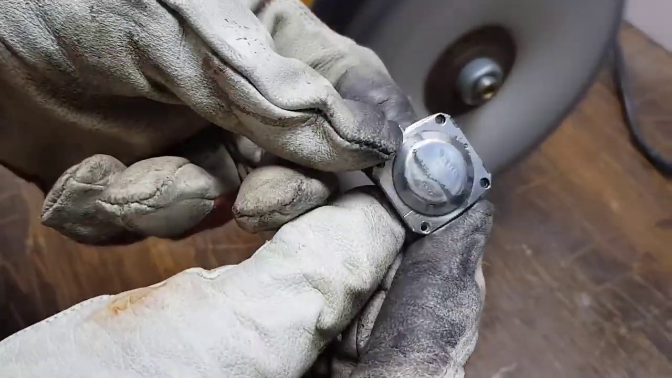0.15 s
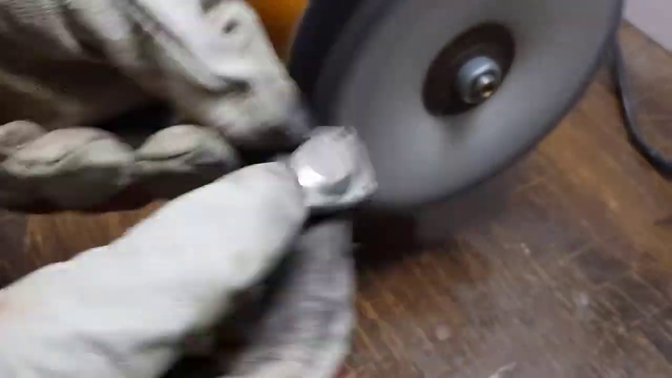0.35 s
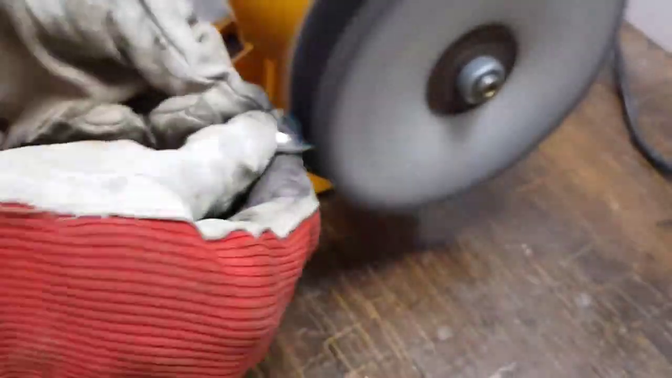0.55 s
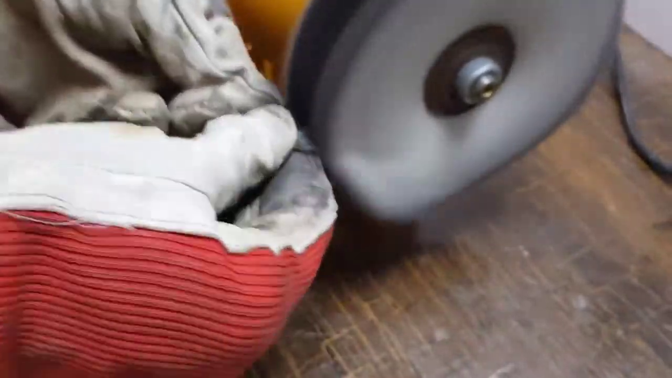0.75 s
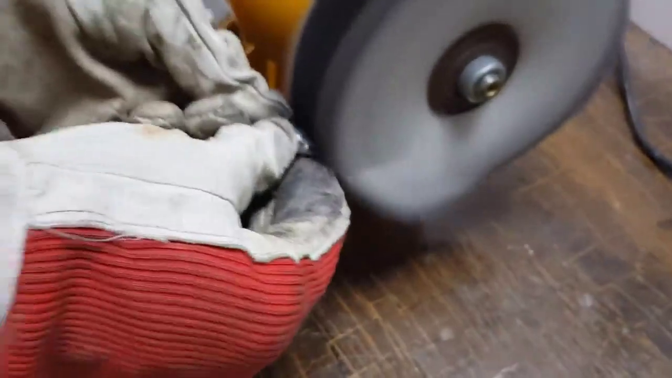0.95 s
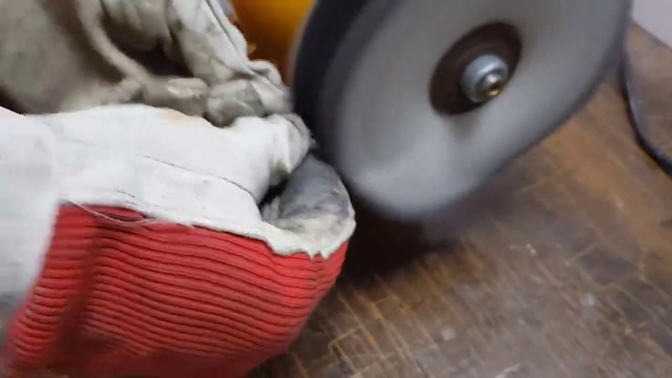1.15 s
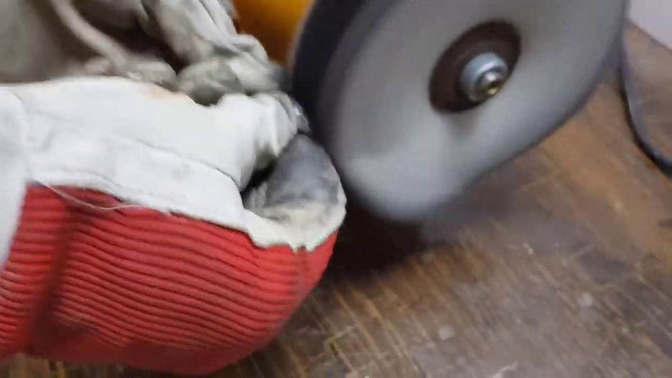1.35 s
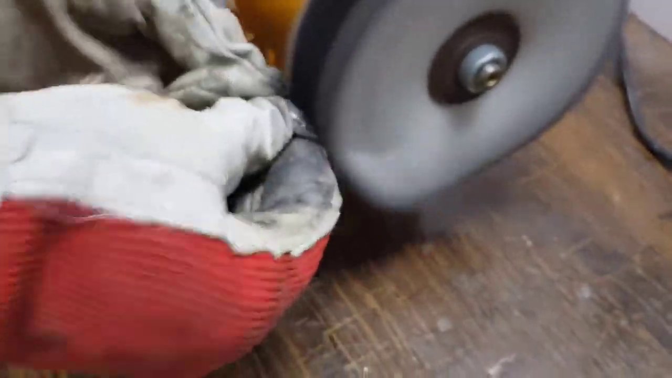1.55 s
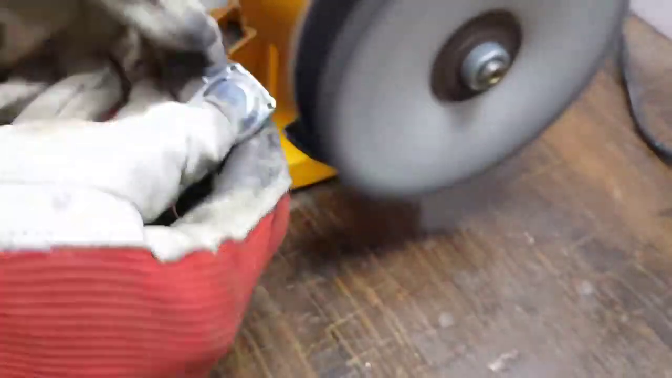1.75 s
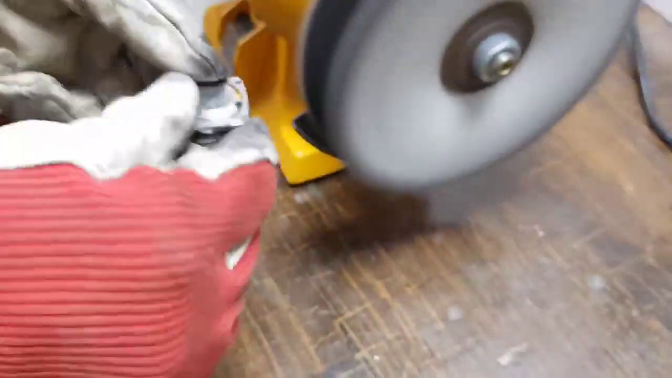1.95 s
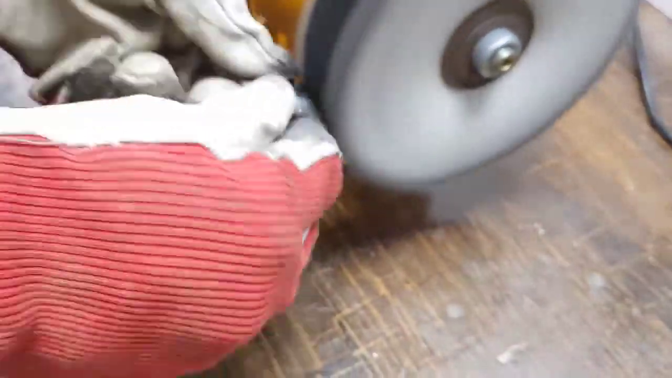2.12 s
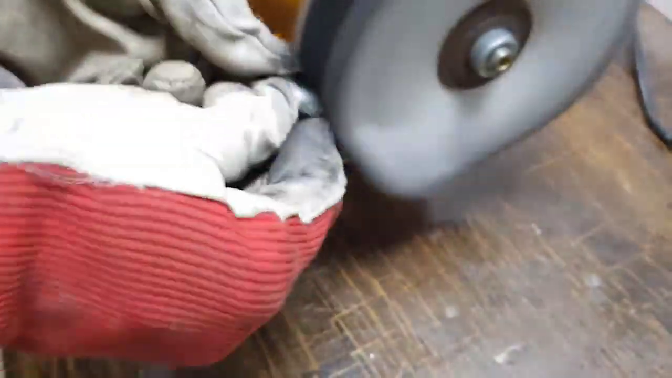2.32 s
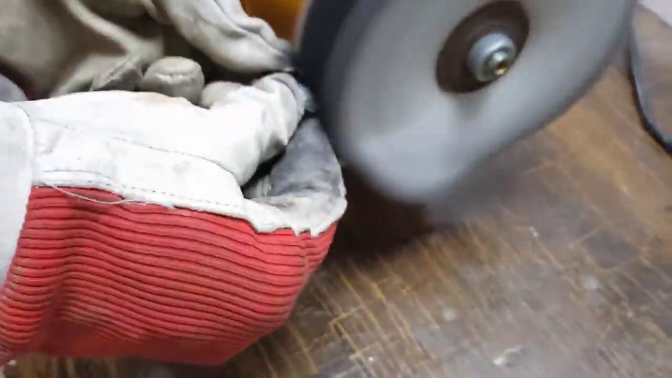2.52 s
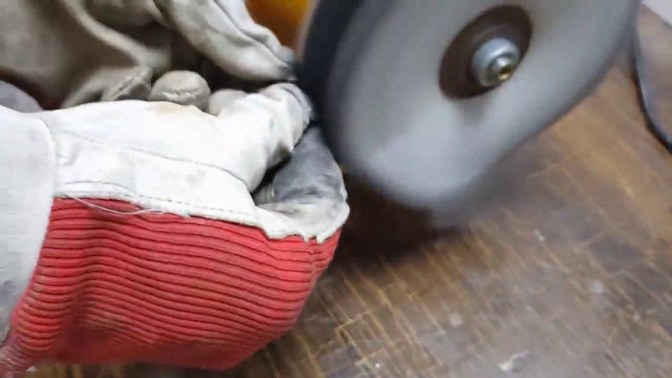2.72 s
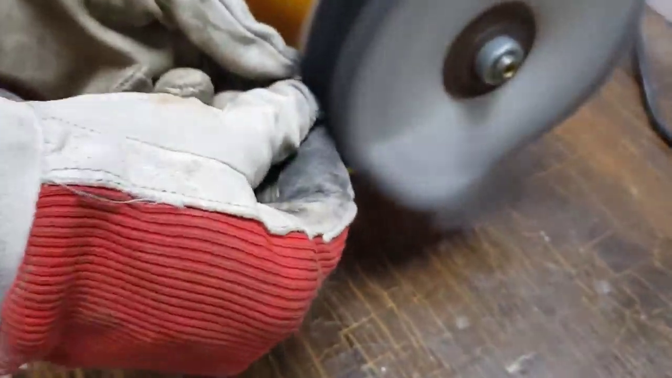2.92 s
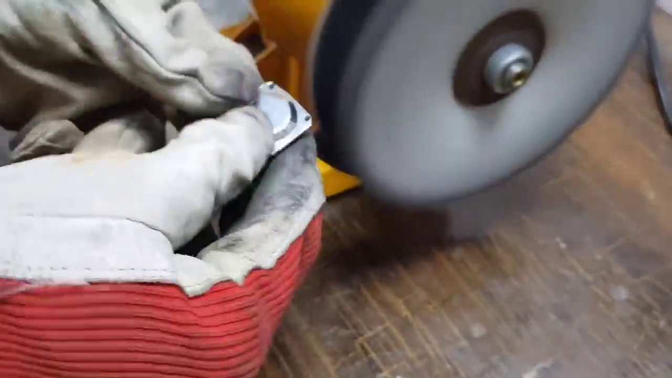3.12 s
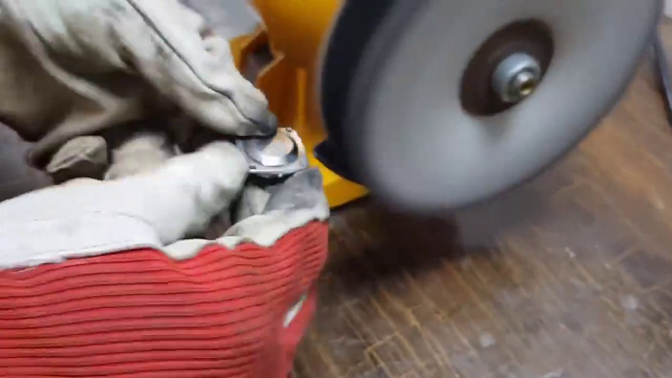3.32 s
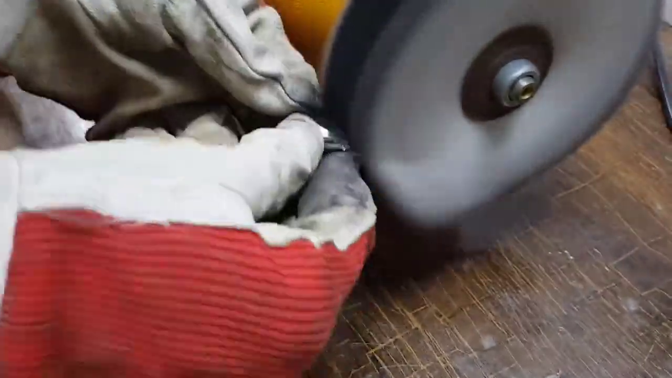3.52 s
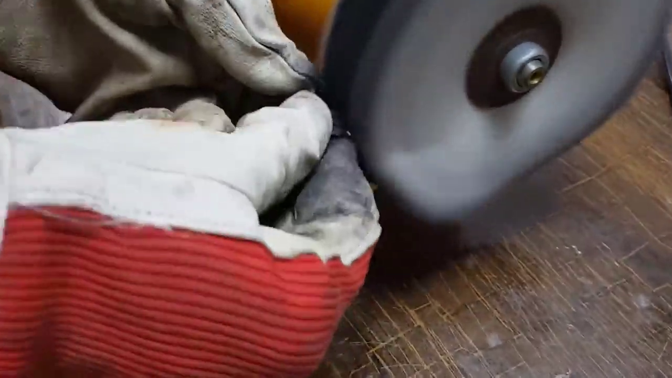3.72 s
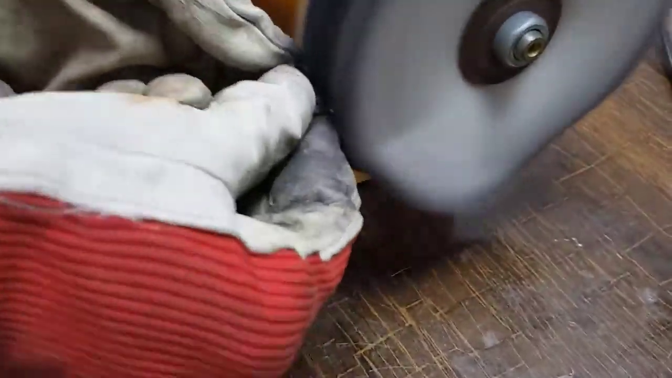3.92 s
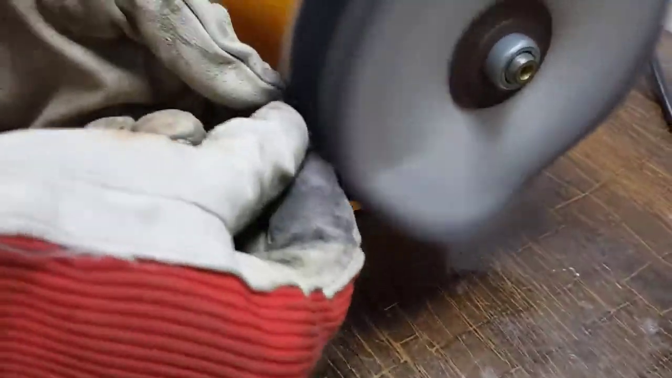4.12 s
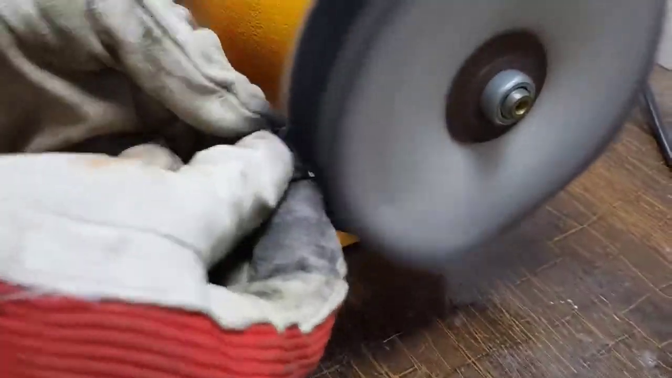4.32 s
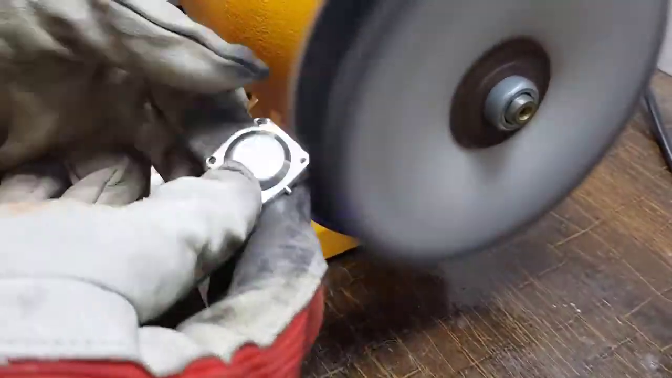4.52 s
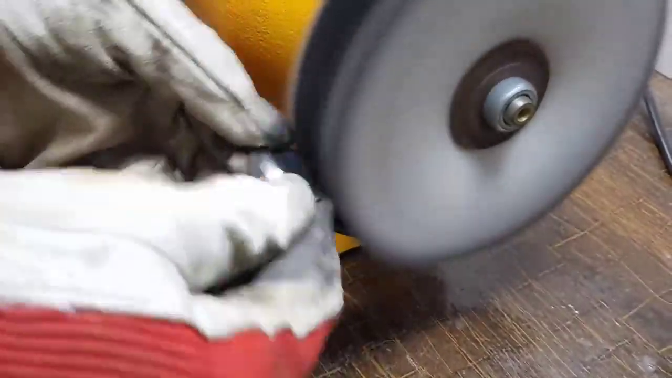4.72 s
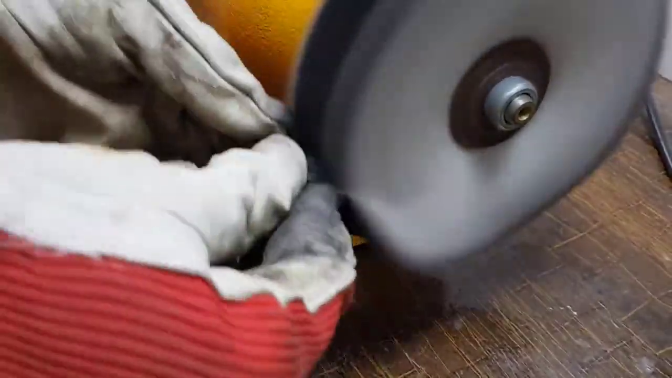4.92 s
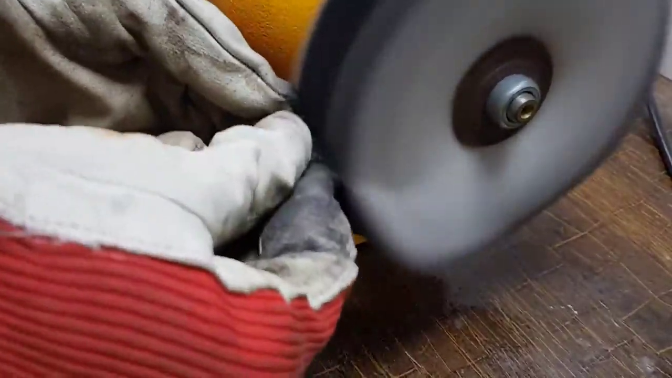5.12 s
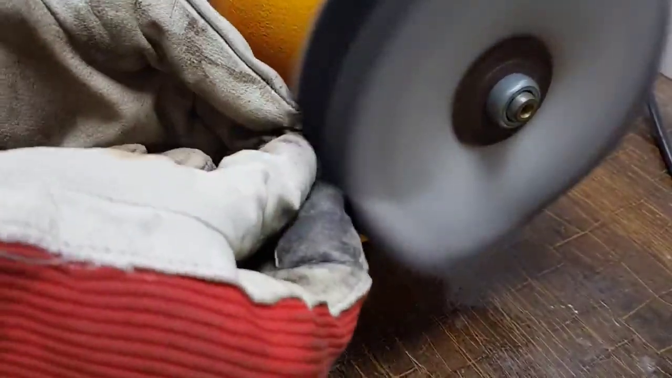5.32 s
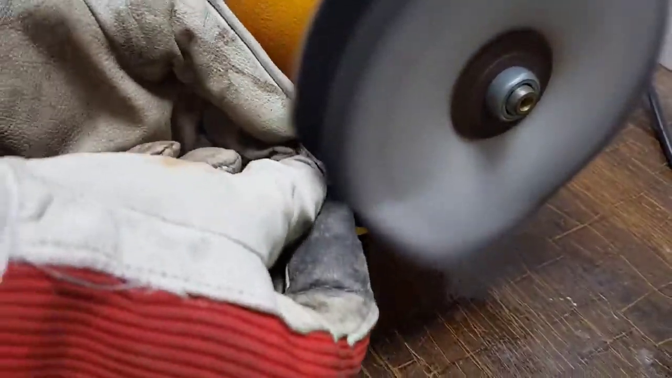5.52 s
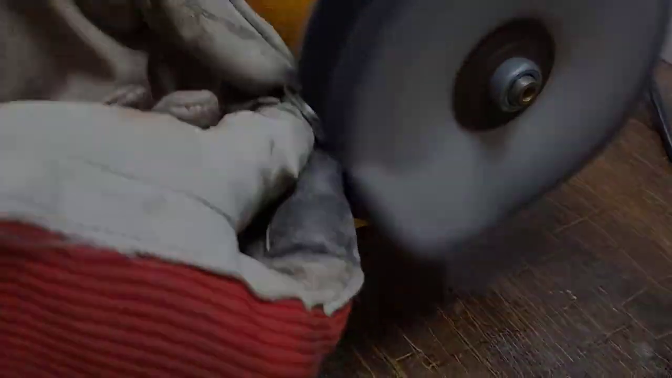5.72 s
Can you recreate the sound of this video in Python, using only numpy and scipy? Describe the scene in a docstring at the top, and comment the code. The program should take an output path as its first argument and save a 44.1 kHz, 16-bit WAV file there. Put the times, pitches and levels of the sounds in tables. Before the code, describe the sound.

A small bench grinder spins freely from 0 to 0.64 seconds, a low hum near 150 hertz with thin whine and fan rush. A steel cap then touches the wheel and grinds until 1.65: dense gritty rasp, broad metallic ringing around 5 to 8 kilohertz and airy hiss, fluttering rapidly with each wheel turn. Pitch sags a few percent as housing tones buzz underneath. The contact stops sharply and the quieter idle whirr returns. A second press lasts from 2.18 to 3.06, sagging deepest. The third, 3.47 to 4.43, is brighter and much hissier, with a soft low air puff on the left near 4.13. After another short idle, the fourth starts at 4.81, fierce and sizzling, continuing to about 5.9, virtually the end. Pressure wavers throughout. The close, dry stereo is louder and brighter on the right, facing the wheel; the left is shaded and weaker.

```python
"""A small fast bench grinder whirrs at idle; four times a gloved hand presses a steel cap on its wheel.
The press rasps, rings and hisses: random grit is read off the rim at the contact, partly kept from turn
to turn, so the sound repeats at the shaft speed, which sags under load. Shaft-order tones join it.
The motor is sine orders over the fan's shaped noise, the draught low noise with puffs.
The near (right) microphone port faces the wheel, the far (left) one is shaded."""
import sys
import numpy as np
from scipy import signal
from scipy.fft import rfft, irfft, next_fast_len
from scipy.io import wavfile
from scipy.ndimage import uniform_filter1d, map_coordinates

SR = 44100
rng = np.random.default_rng(int(sys.argv[2]) if len(sys.argv) > 2 else 0)


def log_audio(samples):
    """Write samples as a 16-bit WAV file to the path given in sys.argv[1]."""
    # one column per channel
    frames = np.atleast_2d(samples).T
    # limit to full scale, then quantise
    limited = np.clip(frames, -1, 1)
    pcm = np.round(limited * 32767).astype(np.int16)
    wavfile.write(sys.argv[1], SR, pcm)


N = 258426
TIME_S = np.arange(N) / SR
IDLE_HZ = 153.6  # shaft turns per s

# shaft under load, one list per press, levels before trim:
# time_s, shaft_hz, fourth_order_db, eighth_order_db
SHAFT_LOAD = [
    [(.69, 151, -72, -55), (.87, 148.5, -70, -51), (1.03, 147.4, -64, -49), (1.2, 146.5, -60, -52),
     (1.28, 147.1, -67, -52), (1.4, 147.8, -62, -51), (1.63, 147, -65, -49)],
    [(2.25, 150.9, -72, -53), (2.34, 148, -62, -47), (2.5, 145.7, -57, -48), (2.68, 146.1, -69, -49),
     (2.87, 145.2, -69, -49), (2.98, 143.5, -70, -52), (3.04, 143, -74, -57)],
    [(3.53, 148.5, -64, -48), (3.71, 145.4, -58, -53), (3.82, 146.5, -61, -54), (4.04, 144.5, -67, -55),
     (4.14, 145.5, -57, -54), (4.3, 145.9, -64, -57), (4.41, 145.8, -61, -59)],
    [(4.88, 150.9, -72, -66), (4.96, 149.2, -62, -56), (5.22, 146, -57, -58), (5.39, 147.4, -60, -53),
     (5.48, 147.6, -67, -57), (5.65, 146.5, -58, -63), (5.78, 146.5, -58, -53), (5.86, 146.6, -62, -58)],
]
# presses: touch_s, lift_s, lift_fade_db_per_s, base grit share kept per turn at touch (0-1), at lift (0-1),
# high_spot_bite_db before scaling per layer, seventh_order_top_db before trim, draught_db
PRESS_ROWS = [(0.637, 1.647, 516, 0.4, 0.45, 1.5, -58.5, -80),
              (2.183, 3.061, 995, 0.47, 0.53, 1.5, -53, -77),
              (3.469, 4.43, 995, 0.46, 0.32, 0.5, -61, -71.5), (4.808, 5.896, 991, 0.46, 0.85, 3, -81, -78)]
(TOUCH_S, LIFT_S, FADE_DB_PER_S, KEPT_AT_TOUCH, KEPT_AT_LIFT,
 BITE_DB, SEVENTH_TOP_DB, DRAUGHT_DB) = np.transpose(PRESS_ROWS)
TOUCH_DB_PER_S = 1202  # rise into the touch

PRESS = np.searchsorted((LIFT_S[:-1] + TOUCH_S[1:]) / 2, TIME_S)  # index of the nearest press
SINCE_TOUCH_S = TIME_S - TOUCH_S[PRESS]
PAST_LIFT_S = np.maximum(TIME_S - LIFT_S[PRESS], 0)
ALONG = np.clip(SINCE_TOUCH_S / (LIFT_S - TOUCH_S)[PRESS], 0, 1)  # 0 at touch, 1 at lift


def amp(db):
    """Amplitude ratio of a level in dB."""
    return 10 ** (np.asarray(db) / 20)


def unit(x):
    """x scaled to an RMS of 1 per channel."""
    return x / np.sqrt(np.mean(x ** 2, axis=-1, keepdims=True) + 1e-20)


def along(points, hz):
    """Interpolates (Hz, value) points on a log frequency axis."""
    f, v = np.transpose(points)
    return np.interp(np.log(hz + 1), np.log(f + 1), v)


def curves(rows):
    """One value per sample for each column after the time."""
    s, *cols = np.transpose(rows)
    return [np.interp(TIME_S, s, c) for c in cols]


def wobble(knots_per_s):
    """A smooth random curve through normal random knots."""
    knots = rng.standard_normal(int(N * knots_per_s / SR) + 4)
    return map_coordinates(knots, [TIME_S * knots_per_s])


def filtered(x, response):
    """x times a complex response of frequency."""
    m = next_fast_len(N + 8192)
    return irfft(rfft(x, m) * response(np.fft.rfftfreq(m, 1 / SR)), m)[..., :N]


def coloured(x, spectrum):
    """x shaped by (Hz, dB) points, at unit RMS."""
    return unit(filtered(x, lambda hz: amp(along(spectrum, hz))))


def drift(pairs):
    """Per press, a straight line from a value at touch to one at lift."""
    first, last = np.asarray(pairs)[PRESS].T
    return first + (last - first) * ALONG


def edge_db():
    """0 while pressed, falling away before the touch and after the lift."""
    return TOUCH_DB_PER_S * np.minimum(SINCE_TOUCH_S, 0) - FADE_DB_PER_S[PRESS] * PAST_LIFT_S


def build_db(depth_db, time_s):
    """Starts low at the touch and closes in on 0."""
    return -depth_db * np.exp(-np.maximum(SINCE_TOUCH_S, 0) / time_s)


def shaft_turns():
    """Turns made so far; the wheel sags from the touch and soon recovers off load."""
    lead_s, recover_s = .02, .06
    rows = [(0, IDLE_HZ)]
    for press, touch_s in zip(SHAFT_LOAD, TOUCH_S):
        rows.append((touch_s - lead_s, IDLE_HZ))
        rows += [row[:2] for row in press]
        rows.append((press[-1][0] + recover_s, IDLE_HZ))
    return np.cumsum(curves(rows)[0]) / SR


def rim(turns, kept, spike_db, high_spot_db, count=1):
    """Two channels of grit read off at the contact; each turn keeps a share of the last, breaks new grains."""
    grits = 320  # per turn
    kept = np.clip(np.interp(np.arange(int(turns[-1]) + 2), turns, kept), 0, .99)
    spikes = amp(spike_db * rng.standard_normal((len(kept), 1, grits)))
    grit = rng.standard_normal((len(kept), 2, grits)) * spikes
    for _ in range(count):  # a second pass makes the wear gradual
        for k in range(1, len(kept)):
            grit[k] = kept[k] * grit[k - 1] + (1 - kept[k] ** 2) ** .5 * grit[k]
        grit /= grit.std(axis=(1, 2), keepdims=True)
    track = np.array([map_coordinates(grit[:, c].ravel(), [turns * grits]) for c in range(2)])
    # the wheel runs out of true: one narrow high spot and four smaller lobes bite harder
    spot = np.exp(1.4 * (np.cos(2 * np.pi * turns) - 1)) - .27
    lobes_db = 0.76 * np.cos(2 * np.pi * 4 * turns + wobble(3.0))
    return track * amp(high_spot_db * spot + lobes_db)


def patches(x, depth_db):
    """Random gain patches a few hundred Hz wide: the part is turned and tilted."""
    z = signal.stft(x, nperseg=256)[2]
    field = uniform_filter1d(rng.standard_normal(z.shape[1:]), size=3, axis=0)
    for _ in range(2):
        field = uniform_filter1d(field, size=14, axis=1)
    return signal.istft(z * amp(depth_db * field / field.std()), nperseg=256)[1][:, :N]


def draught():
    """Air thrown off the work buffets the far port: lumpy low noise with a few puffs."""
    # puffs at the far port: time_s, level_db
    puff_rows = [(2.41, -71), (2.82, -74), (3.79, -76), (4.0, -71), (4.13, -60), (5.07, -69), (5.29, -75)]
    puff_s = 0.025
    lumps = amp(2.5 * wobble(20)) * rng.standard_normal(N)
    steady = amp(DRAUGHT_DB[PRESS] + edge_db() + 3.5 * wobble(3.2)) * np.sin(np.pi * ALONG)
    puffs = sum(amp(db) * np.exp(-((TIME_S - s) / puff_s) ** 2) for s, db in puff_rows)
    spectrum = [(40, -45), (100, -20), (200, -1), (320, -11.5), (600, -3), (1200, -90)]  # Hz, dB
    return (steady + puffs) * coloured(lumps, spectrum)


def motor(turns):
    """Unbalance hum, commutator and bearing orders over fan rush; quieter pressed and after the first press."""
    # shaft orders: idle_hz (rounded to a whole order), level_db before trim
    order_rows = [(920.5, -79), (1075, -85), (1229, -84), (1540, -84), (1843, -84), (1997, -85),
                  (2148, -76), (2460, -84), (2767, -84), (3225, -81), (3531, -84), (3688, -81), (3838, -85),
                  (4145, -86), (4608, -80), (4764, -84), (5222, -82), (5529, -86), (5685, -80), (5992, -83),
                  (6142, -87), (6298, -83), (6449, -81), (7526, -81), (7833, -90), (7989, -88), (8296, -88),
                  (10293, -89), (10750, -81), (11213, -89), (11983, -88), (12597, -90), (14131, -89),
                  (14745, -89)]
    # spectrum shape of fan and bearings: frequency_hz, density_db_per_hz
    air_shape = [(25, -19), (60, -21), (100, -13.5), (150, 4.5), (254, 5.5), (473, 4), (563, -2),
                 (928, -0.5), (1420, -8.5), (2170, -8.5), (3300, -9), (4600, -10.5), (6400, -10.5),
                 (8500, -13.5), (11000, -12), (13000, -10.5), (15000, -14.5)]
    # free-running sound, levels before trim: time_s, bass_db, treble_db
    whirr_rows = [(0, -63.5, -67.5), (.6, -65, -67), (.75, -73, -71), (1.75, -69, -73.5),
                  (2.15, -69.5, -73), (3.15, -71.5, -71), (3.4, -68.5, -71.5), (4.5, -70, -72),
                  (4.75, -69, -71.5), (5.86, -69, -64)]
    bass_db, treble_db = curves(whirr_rows)
    pressed = amp(edge_db())  # 0-1
    tones = 0
    for hz, db in order_rows:
        cycles = round(hz / IDLE_HZ) * turns + rng.random((2, 1))
        tones = tones + amp(db + 1.6 * wobble(5.3)) * np.sin(2 * np.pi * cycles)
    per_turn = rim(turns, np.full(N, .98), 2.6, 0.74)  # nearly the same each turn
    rush = coloured(rng.standard_normal((2, N)) + 0.31 * per_turn, air_shape)
    whole = rush + amp(66 - 2.5 * pressed) * tones
    bass = filtered(whole, lambda hz: 1 / (1 + (hz / 700) ** 2))
    unbalance = amp(-4.5 - 8.5 * pressed + 0.57 * wobble(5.7)) * np.sin(2 * np.pi * turns)
    hum = amp(bass_db) * (bass + unbalance)
    whine = amp(treble_db + 7 - 0.43 * pressed) * (whole - bass)
    return hum, whine


def wheel_tones(turns):
    """Under load the fourth, seventh and eighth orders of the shaft shake housing and bench."""
    rise_db, rise_s = 22, 0.037  # build-up after touch
    lead_s, dying_db_per_s = 0.022, 460  # the tones start to die just before the lift
    seventh_arch_db = 29.5  # swell to mid-press
    fourth_db, eighth_db = curves(np.concatenate(SHAFT_LOAD))[1:]
    seventh_db = SEVENTH_TOP_DB[PRESS] - seventh_arch_db * (2 * ALONG - 1) ** 2

    def tone(order, db):
        level = amp(db + 3.5 + 2.05 * wobble(45))
        return level * np.sin(2 * np.pi * order * turns + 0.66 * wobble(25))

    dying_db = dying_db_per_s * np.maximum(TIME_S - LIFT_S[PRESS] + lead_s, 0)
    load = amp(edge_db() + build_db(rise_db, rise_s) - dying_db)
    return load * (tone(4, fourth_db) + tone(7, seventh_db) + tone(8, eighth_db))


def cap(scrape):
    """The scrape rings each broad mode of the cap; the grip shares the same energy out among them."""
    # modes of the cap: frequency_hz, width_hz
    mode_rows = [(4700, 890), (5450, 560), (6350, 650), (7000, 820), (7900, 1050)]
    # the fingers damp the modes, per press: five relative mode_db at touch, five at lift
    grip_db = [
        [(-4, -0.5, 2.8, 11.8, -40), (-6.5, -6, 2.7, 2.3, -5.5)],
        [(-10, 2, 0.77, 5.4, -6), (-9, -9, 1.3, 1.2, -45)],
        [(-7.5, -16.5, 6.3, -7, 2.5), (-0.5, -2, 10.3, -34, 0.6)],
        [(7, -0.81, 11, -9, 14), (-4.5, -0.3, 2.5, -13, -4)],
    ]
    gains = np.array([amp(drift(db)) for db in np.moveaxis(grip_db, 2, 0)])
    gains = gains / np.sqrt(np.sum(gains ** 2, axis=0))

    def mode(hz, width_hz):
        return lambda f: np.abs(f * width_hz / (hz * hz - f * f + 1j * f * width_hz)) ** 2

    return unit(sum(g * unit(filtered(scrape, mode(*row))) for row, g in zip(mode_rows, gains)))


def grinding(turns):
    """Grit rasps, rings the cap and hisses; each layer keeps its own share of grit from turn to turn."""
    # while pressed, one list per press, levels before trim: time_s, hiss_db, ring_db, rasp_db
    pressure_rows = [
        [(0.64, -38, -41.5, -55), (0.7, -40.5, -42, -54), (0.778, -37, -48, -53), (0.806, -38.5, -46.5, -57),
         (1.048, -38.5, -48, -53.5), (1.202, -39, -48, -56.5), (1.344, -40, -47, -53.5),
         (1.382, -39.5, -49.5, -53.5), (1.536, -37, -48.5, -51), (1.64, -40.5, -49.5, -54.5)],
        [(2.19, -45.5, -48.5, -61.5), (2.238, -40.5, -48.5, -60.5), (2.282, -38, -45, -51.5),
         (2.346, -36, -46.5, -56), (2.588, -39.5, -44.5, -52.5), (2.8, -41, -47, -55.5), (2.856, -36, -45, -51),
         (2.988, -37, -42.5, -54), (3.034, -35.5, -45.5, -52.5), (3.055, -39.5, -46.5, -55.5)],
        [(3.47, -36.5, -40.5, -60.5), (3.488, -31.5, -37, -55.5), (3.634, -31.5, -42.5, -53),
         (3.664, -32, -43, -48.5), (3.774, -34, -42.5, -59), (3.828, -34.5, -43, -54),
         (4.008, -31.5, -40.5, -54.5), (4.16, -29, -41, -54.5), (4.384, -27.5, -42, -55),
         (4.42, -34, -51, -61.5)],
        [(4.812, -33.5, -51, -63), (4.876, -27.5, -39.5, -55.5), (4.898, -31.5, -48.5, -56),
         (4.934, -27.5, -38, -53.5), (5.092, -30, -45.5, -56), (5.118, -28, -42.5, -55),
         (5.474, -30.5, -45, -59), (5.71, -31, -42, -53.5), (5.784, -29, -46.5, -55.5),
         (5.86, -31.5, -39.5, -57)],
    ]
    # spectrum shape of the rasp: frequency_hz, density_db_per_hz
    rasp_shape = [(150, -51), (250, -5), (600, -3.5), (800, -1), (1100, 5.5), (1500, 2.5), (1800, 4),
                  (2200, 2.5), (2700, 6.5), (3300, 3), (3900, 2), (4400, -10.5), (5200, -31), (8000, -120)]
    # spectrum shape of the hiss: frequency_hz, density_db_per_hz
    hiss_shape = [(5000, -120), (7000, -38), (8000, -16.5), (8800, -12), (9600, 1), (10600, -0.5),
                  (11300, -1), (12100, 4.5), (13000, 0.5), (14000, 5), (15000, 0.5)]
    hiss_db, ring_db, rasp_db = curves(np.concatenate(pressure_rows))
    kept = drift(np.transpose([KEPT_AT_TOUCH, KEPT_AT_LIFT])) + 0.18 * wobble(10)
    bite_db = BITE_DB[PRESS] + 1.5 * wobble(14)
    rasp_grit = rim(turns, 0.33 + .3 * kept, 2.54, 1.06 * bite_db, count=2)
    ring_grit = rim(turns, kept - .12, 2.1, 0.37 * bite_db, count=2)
    hiss_grit = rim(turns, kept - .05, 1, bite_db)
    rasp = coloured(patches(rasp_grit, 2.57), rasp_shape)
    ring = cap(patches(ring_grit, 2.46))
    hiss = coloured(patches(hiss_grit, 2.0), hiss_shape)
    treble = amp(ring_db) * ring + amp(hiss_db + 0.23 * wobble(14)) * hiss
    rasp_edge_db = 0.59 * edge_db()  # softer edges than the treble
    return amp(1.5 + rasp_db + rasp_edge_db) * rasp, amp(2.5 + edge_db()) * treble


def scene():
    """The far (left) port hears a filtered copy, alike around 550 Hz and less so above and below."""
    # left-right likeness: frequency_hz, likeness (0-1)
    alike = [(60, 0.07), (180, 0.68), (550, 1), (1650, 0.52), (4970, 0.16), (15000, 0.38)]
    # far port against near port: frequency_hz, level_db
    far_shape = [(60, -25), (140, -19.5), (330, -16.5), (770, -11.5), (1170, -14), (1800, -9), (2740, -6.5),
                 (4200, -8.5), (6200, -18), (7000, -17), (8500, -6), (9800, -16.5), (12000, -20),
                 (14000, -28.5), (15000, -40)]
    # extra grinding treble gain at the far port, per press: touch_db, lift_db
    shading_db = [(3.5, 4), (5, 3.5), (-0.5, -3), (-4, -7)]
    idle_shade_db, far_leads_s = -5, 2e-5  # the far port hears it slightly earlier
    turns = shaft_turns()
    rasp, hiss = grinding(turns)
    hum, whine = motor(turns)
    low = rasp + hum + wheel_tones(turns)
    shaded = low + amp(drift(shading_db)) * hiss + amp(idle_shade_db) * whine

    def far_response(hz):
        like = np.clip(along(alike, hz), 0, 1)
        path = amp(along(far_shape, hz)) * np.exp(2j * np.pi * hz * far_leads_s)
        return path * np.array([like, np.sqrt(1 - like ** 2)])  # shared part, independent part

    far = filtered(shaded, far_response).sum(axis=0)
    near = (low + hiss + whine)[0]
    return np.array([amp(3.5) * far + draught(), amp(3.5) * near])


def record(dry):
    """Soft fade over the 120 Hz below the top of the band."""
    top_hz = 15725
    return filtered(dry, lambda hz: np.sin(np.pi / 2 * np.clip((top_hz - hz) / 120, 0, 1)) ** 2)


dry = scene()
out = record(dry)
log_audio(out)
```